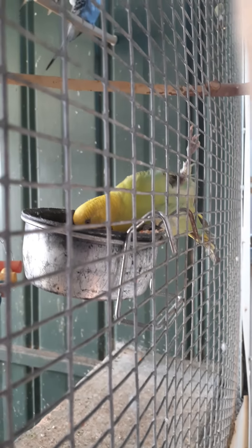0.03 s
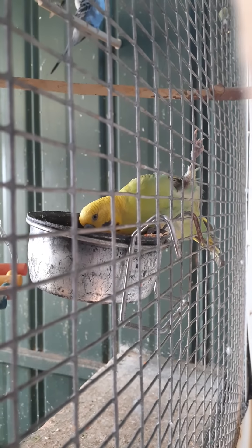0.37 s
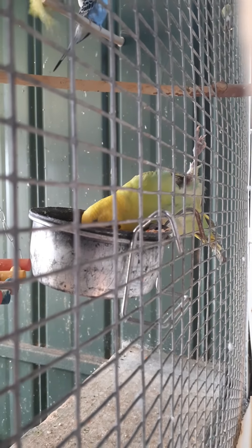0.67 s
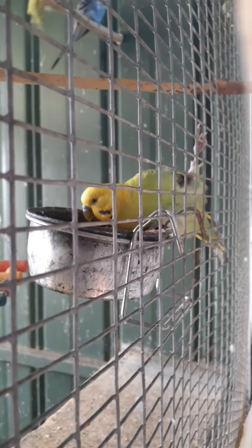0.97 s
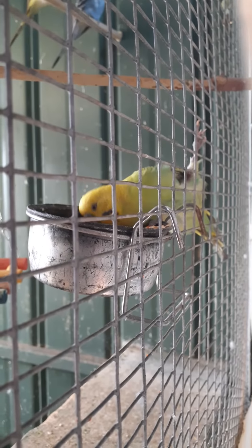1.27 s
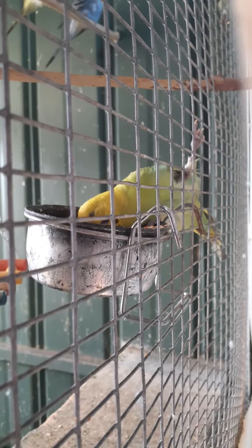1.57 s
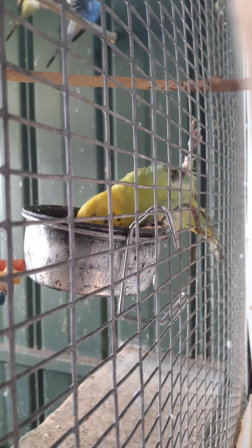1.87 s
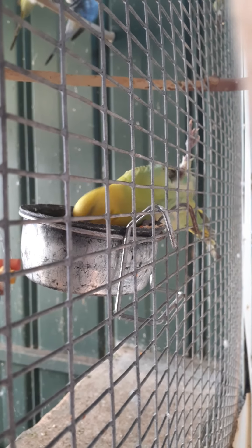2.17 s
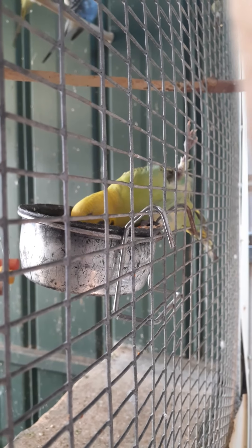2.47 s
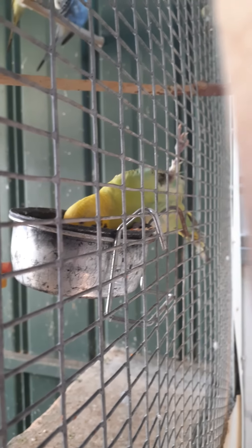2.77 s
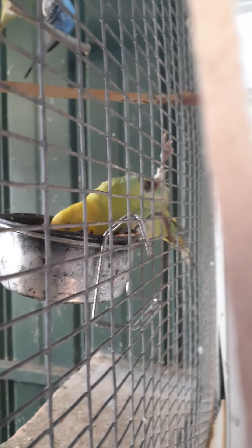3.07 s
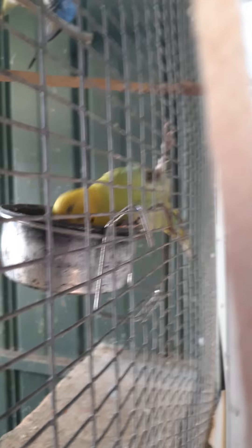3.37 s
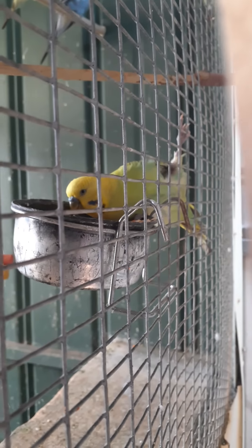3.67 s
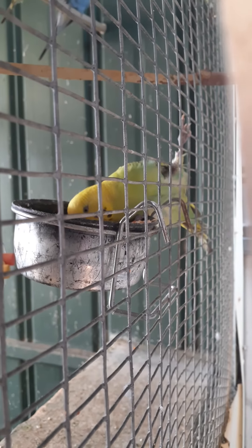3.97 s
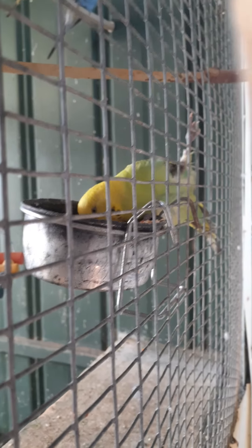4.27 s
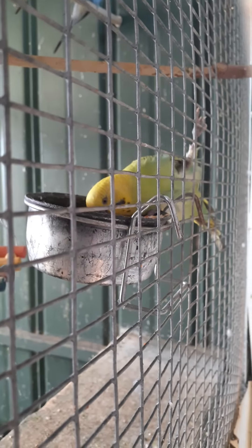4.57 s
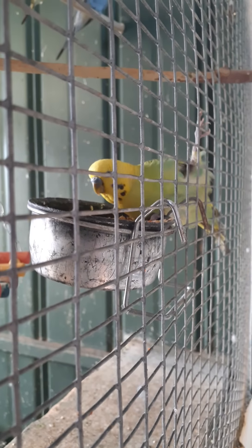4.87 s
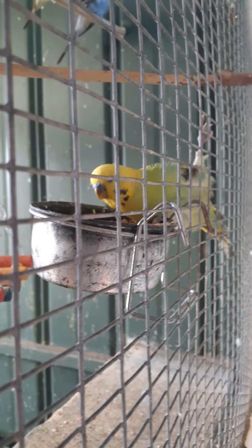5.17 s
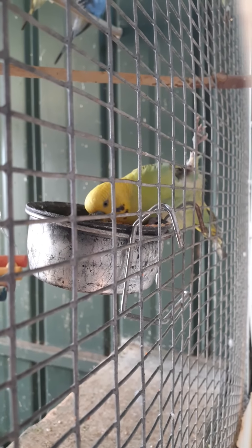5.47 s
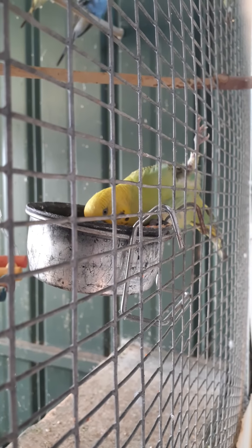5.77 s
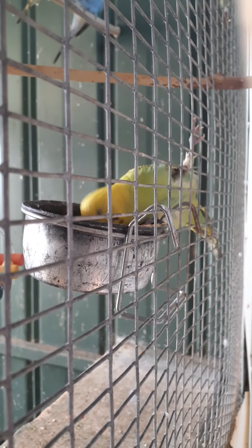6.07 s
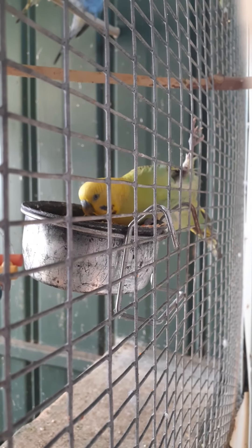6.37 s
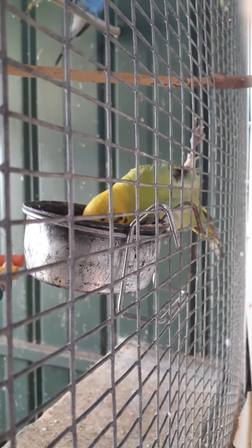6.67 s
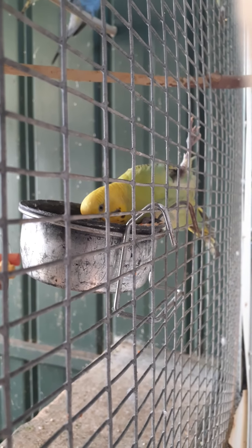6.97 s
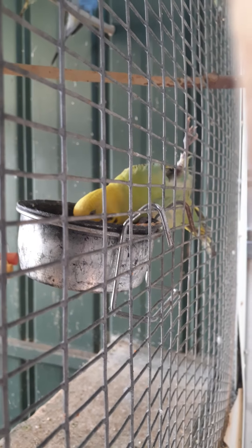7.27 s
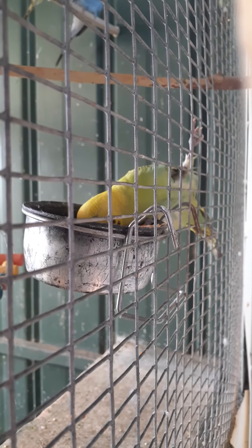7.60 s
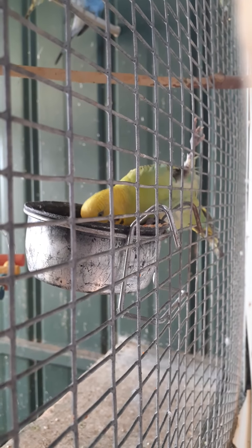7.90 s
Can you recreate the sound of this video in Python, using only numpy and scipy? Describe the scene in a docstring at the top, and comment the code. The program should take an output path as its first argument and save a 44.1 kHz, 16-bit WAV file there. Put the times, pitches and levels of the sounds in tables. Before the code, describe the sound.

A budgie feeds from a metal bowl in a small aviary, stirring seed, cracking husks with tiny clicks and bumping the bowl so it rings faintly. Other budgies give short whistled chirps, then quick warbles. Past the middle the digging peaks and three raspy squawks stand out, before feeding continues with one last warble. A few dull knocks land close to the microphone over a faint outdoor rumble.

```python
"""A budgerigar digs for seed in a metal bowl hung on the wire of a small, hard-walled aviary.
From the start its beak stirs seed, cracks husks and bumps the bowl; other budgerigars chirp in short
whistled glides, with a few dull knocks close by and a faint outdoor rumble throughout. At 2 s something
brushes past on the right. Warbling follows from 3.3 s; around 5 s the digging peaks and three forced
squawks break into a rasp. The feeding goes on, with a last warble at 7.4 s."""
import sys
import numpy as np
from scipy import signal
from scipy.fft import rfft, irfft
from scipy.io import wavfile

SR = 44100
rng = np.random.default_rng(int(sys.argv[2]) if len(sys.argv) > 2 else 0)


def unload_audio(sound):
    """Save the sound as a 16-bit wav file, at the path given as the first command line argument."""
    columns = np.transpose(np.atleast_2d(sound))
    # keep every value between -1 and 1, then stretch to whole-number steps
    steps = np.round(np.clip(columns, -1, 1) * 32767)
    wavfile.write(sys.argv[1], SR, steps.astype(np.int16))


N = 354343
TIME_S = np.arange(N) / SR
CUTOFF_HZ = 15900

# Drives outdoor rumble and bowl hum. Each row: time in seconds, relative level in dB.
LOW_LEVEL_CURVE = [(0.0, -61), (0.24, -68.5), (1.32, -64.5), (2.39, -69.5), (3.96, -64), (4.58, -69.5),
                   (4.79, -60.5), (5.16, -66.5), (5.46, -57), (5.77, -67), (6.35, -64.5), (6.84, -73),
                   (7.2, -67), (8.03, -71.5)]


def digging(thud_db=-1, ring_db=-6, scrape_db=-1):
    """Seeds tumble against each other and the metal; returns the bowl's shudder and the rustle."""
    # Each row: start in seconds, length in seconds, relative thud, scrape and husk levels in dB.
    digs = [(0.034, 0.06, -55, -52.5, -65), (0.099, 0.056, -51, -56, -60), (0.494, 0.064, -64.5, -71, -79),
            (0.859, 0.017, -57, -60.5, -70), (0.95, 0.012, -78, -90, -65),
            (1.069, 0.063, -62.5, -69, -56.5), (1.153, 0.053, -56.5, -58.5, -73.5),
            (1.388, 0.025, -78, -83, -69), (1.46, 0.062, -58, -71.5, -78), (1.679, 0.056, -62, -59.5, -58),
            (1.732, .08, -57, -71, -95), (1.835, 0.082, -55, -58, -69.5), (2.682, 0.1, -66.5, -61.5, -70.5),
            (3.476, 0.062, -83, -60, -61.5), (4.534, 0.085, -61.5, -68, -71), (4.64, 0.04, -52, -45, -75),
            (4.669, 0.018, -51, -50.5, -69), (4.704, 0.087, -51, -56, -62), (4.803, 0.085, -59.5, -63, -77),
            (4.964, 0.012, -57, -51, -45), (5.314, 0.17, -48.5, -53, -56),
            (5.987, 0.038, -60.5, -61.5, -59), (6.179, 0.011, -83, -67, -59),
            (6.239, 0.062, -59.5, -49.5, -80), (6.386, 0.077, -60.5, -63, -57.5),
            (6.491, 0.021, -62, -82, -58), (6.521, 0.043, -65, -52.5, -62.5),
            (7.05, 0.047, -87, -66, -58.5), (7.093, 0.037, -76, -54, -76), (7.295, 0.07, -58, -61.5, -73),
            (7.926, 0.038, -66.5, -69, -101)]
    # Spectra of bowl thud, seed scrape and husk rustle. Each row: frequency in Hz, density in dB.
    thud_spectrum = [(40, -11), (70, 0), (130, 3.5), (200, 0.5), (320, -0.5), (480, -2.5), (800, -19.5),
                     (1600, -34)]
    scrape_spectrum = [(300, -15), (650, 2), (1100, 2), (1900, -3.5), (3000, -4.5), (4500, -15.5),
                       (7000, -26.5)]
    husk_spectrum = [(1500, -10.5), (3000, -8.5), (4500, -4), (7000, -4.5), (9300, 1.5), (10800, -3.5),
                     (12500, -3), (15500, -14)]
    thud, scrape, husk = np.zeros((3, N))
    for start_s, length_s, *levels_db in digs:
        force = beak_stroke(length_s)
        for envelope, level_db in zip((thud, scrape, husk), levels_db):
            add(envelope, start_s, force * from_db(level_db))
    bumps = thud * grains(per_s=900, spread_db=2.8)
    shudder = from_db(thud_db) * colour(bumps, thud_spectrum) + from_db(ring_db) * bowl_ring(bumps)
    rustle = from_db(scrape_db) * colour(scrape * grains(per_s=2500, spread_db=3), scrape_spectrum)
    rustle += colour(husk * grains(per_s=2000, spread_db=4.4), husk_spectrum)
    return shudder, rustle


def beak_stroke(length_s, rise_s=0.005, settle_s=0.014):
    """Force of one dig: quick in, easing off, then the seed settles."""
    t = TIME_S[:int(length_s * SR) + SR // 5]
    easing = from_db(2.5 - 5 * t / length_s)
    return np.minimum(t / rise_s, 1) * easing * np.exp(-np.maximum(t - length_s, 0) / settle_s)


def bowl_ring(force):
    """The bowl and its wire hanger ring in their modes."""
    # Each row: frequency in Hz, gain in dB, T60 in seconds.
    modes = [(123.4, -2.5, 0.88), (145.8, -8.5, 0.49), (297.5, -6, 0.37), (348.7, -1.5, 0.062),
             (445.6, -6.5, 0.1), (980, -13.5, 0.63), (1200, -18, .25)]
    return sum(from_db(db) * resonator(force, hz, t60_s) for hz, db, t60_s in modes)


def bowl_hum(gain_db=-8):
    """The bird's shifting weight keeps the bowl faintly ringing."""
    return bowl_ring(curve_gain(LOW_LEVEL_CURVE, gain_db) * grains(per_s=120, spread_db=5.9))


def nibbling(gain_db=3):
    """Tiny bright beak contacts between the digs."""
    # Each row: time in seconds, relative level in dB.
    activity = [(0.0, -76), (0.11, -86), (0.4, -76), (1.03, -75), (1.19, -83), (1.45, -82), (1.81, -78),
                (1.99, -89), (2.46, -83.5), (3.49, -84), (4.29, -87.5), (4.45, -81), (4.58, -74),
                (4.85, -66.5), (5.01, -69.5), (5.34, -56), (5.57, -85.5), (5.79, -80.5), (6.42, -71.5),
                (6.62, -86.5), (6.93, -88.5), (7.65, -73.5), (8.03, -82)]
    # Each row: frequency in Hz, density in dB.
    spectrum = [(2500, -15.5), (4000, -2), (7000, -2.5), (9700, 1.5), (12000, 1), (15500, -3)]
    return curve_gain(activity, gain_db) * colour(grains(per_s=710, spread_db=2.9), spectrum)


def husk_cracks():
    """Single husks snap in the beak and echo off the walls."""
    # Each row: start in seconds, relative level in dB.
    events = [(0.037, -49), (0.3745, -35), (0.8635, -39.5), (0.8966, -38.5), (1.061, -32.5),
              (1.3673, -45.5), (1.5844, -66), (2.7284, -39.5), (3.2846, -51), (3.929, -46.5),
              (4.4051, -35.5), (4.518, -45.5), (4.6754, -29), (5.2554, -45.5), (6.182, -47.5), (6.243, -33),
              (7.338, -45.5)]
    # Each row: frequency in Hz, density in dB.
    spectrum = [(200, -14.5), (900, -6.5), (2500, 5.5), (4500, 1.5), (7000, -3), (9500, -0.5),
                (15500, -5.5)]
    cracks = snaps(events, spectrum, gain_db=6, decay_s=0.0003)
    direct = place(cracks, pan_db=0, lead_ms=0.368)
    return direct + reflections(cracks, wet_db=2, early_db=1.5, pan_db=3, early_s=0.0043)


def feeding_bird():
    """Bowl, seed and husks, heard directly and off the walls."""
    shudder, rustle = digging()
    shudder += bowl_hum()
    bowl = from_db(-2.3) * place(shudder, pan_db=3.5, lead_ms=0.51)
    bowl += reflections(shudder, wet_db=-10.5, early_db=-9.5, pan_db=2, early_s=0.0081)
    rustle += nibbling()
    seed = from_db(-7.5) * place(rustle, pan_db=5, lead_ms=0.347)
    seed += reflections(rustle, wet_db=-4, early_db=-0.5, pan_db=1.7, early_s=0.0045)
    return bowl + seed + husk_cracks()


def near_birds(direct_db=-4):
    """Each call comes from its perch and excites the aviary on that side."""
    # Each row: start in seconds, length in seconds, first and last pitch in Hz,
    # relative level in dB, roughness from 0 to 1.
    syllables = [ (0.053, 0.011, 4430, 3700, -53.5, .2), (0.122, 0.039, 3370, 3590, -48, 0.45),
                 (0.27, 0.039, 3820, 4120, -54.5, 0.34), (0.363, 0.022, 4040, 3260, -34, 0.29),
                 (0.478, 0.021, 2800, 2614, -56, 0.42), (0.607, 0.035, 1944, 1640, -50, 0.18),
                 (0.757, 0.041, 2594, 2440, -55.5, 0.4), (1.02, 0.012, 2760, 2980, -44, 0.1),
                 (1.027, 0.027, 3630, 3600, -51, 0.25), (1.062, 0.013, 4670, 4140, -45.5, 0.1),
                 (1.079, 0.01, 3140, 3230, -33, 0.07), (1.099, 0.011, 3080, 3026, -35.5, 0.05),
                 (1.116, 0.016, 2610, 2175, -38.5, 0.35), (1.145, 0.028, 1757, 1396, -42, 0.26),
                 (1.226, 0.024, 2484, 2240, -54.5, 0.36), (2.493, 0.021, 3194, 3035, -43.5, .15),
                 (2.762, 0.051, 2004, 2310, -59, 0.32), (3.313, 0.028, 2780, 2430, -49.5, 0.2),
                 (3.326, 0.032, 2010, 1740, -43, 0.08), (3.372, 0.019, 1315, 1450, -40.5, 0.02),
                 (3.393, 0.027, 1734, 2235, -38, 0.26), (3.412, 0.037, 2993, 2597, -35.5, 0.09),
                 (3.712, 0.019, 1870, 2600, -49, 0.3), (3.736, 0.0087, 3500, 3900, -45, 0.2),
                 (3.744, 0.015, 3000, 2780, -41.5, 0.2), (3.761, 0.0091, 1564, 2260, -39, 0.29),
                 (3.766, 0.019, 3190, 2830, -39, 0.16), (3.793, 0.027, 2226, 2427, -34, 0.17),
                 (3.82, 0.015, 2827, 3104, -29.5, 0.16), (3.835, 0.02, 1804, 1504, -37.5, 0.29),
                 (3.875, 0.019, 2210, 1746, -41, 0.28), (4.751, 0.029, 4190, 3980, -35.5, 0.2),
                 (4.85, .014, 2020, 1890, -45, .15), (5.066, 0.019, 2446, 3040, -41, 0),
                 (5.082, 0.014, 3330, 4010, -38, 0.25), (5.095, 0.017, 3400, 2960, -34.5, 0.07),
                 (5.117, 0.021, 2810, 2500, -39, 0.09), (5.15, 0.02, 2545, 2626, -34, .05),
                 (5.168, .016, 2700, 3425, -27, .04), (5.185, .022, 2930, 1496, -42, 0.7),
                 (7.402, 0.021, 2606, 2850, -47, 0.2), (7.42, 0.0075, 3880, 4200, -41.5, 0.22),
                 (7.43, 0.021, 3210, 2796, -35, 0.13), (7.452, 0.019, 2610, 2535, -36.5, .08),
                 (7.468, 0.019, 1990, 2510, -40.5, 0.12), (7.488, 0.028, 2533, 3400, -29, 0.14),
                 (7.514, 0.023, 2384, 1302, -40, 0.27), (7.617, 0.034, 1713, 1720, -57, 0.33),
                 (7.993, .012, 5750, 5450, -52.5, 0.25)]
    # Each row: as above, with the held pitch in Hz in place of the last.
    squawks = [(4.912, 0.043, 951, 3200, -32.5, 0.7), (5.294, .044, 2204, 3750, -28.5, 0.67),
               (5.409, 0.056, 2997, 3600, -20, .9)]
    # Each row: valid from in seconds, left minus right in dB, left lead in ms, overtone gain in dB.
    perches = [(0, -5.5, -0.49, -2.5), (.6, -3.5, 0.26, 3.5), (1, -1.5, 0.57, -1.5), (2.4, -8.5, .16, 0),
               (2.9, -1.5, 0.46, -5), (3.7, -1.5, 0.57, 5), (5.06, -7.5, 0.59, 0.5), (5.28, -2.2, 0.48, 8),
               (7.39, -0.5, -0.6, -0.5)]
    ears = np.zeros((2, N))
    for voice, calls in ((syllable, syllables), (squawk, squawks)):
        for start_s, *shape in calls:
            perch = sum(from_s <= start_s for from_s, *_ in perches[1:])
            _, pan_db, lead_ms, overtone_db = perches[perch]
            call = place(voice(*shape, overtone_db), pan_db, lead_ms)
            for ear, sound in zip(ears, call):
                add(ear, start_s, sound)
    walls = reflections(ears, wet_db=-9, early_db=-2.5, pan_db=1.5, early_s=0.0084)
    return from_db(direct_db) * ears + walls


def syllable(length_s, first_hz, last_hz, level_db, roughness, overtone_db):
    """One short glide, up or down, lingering at its low end."""
    count = int(length_s * SR)
    height = np.linspace(0, 1, count) if last_hz > first_hz else np.linspace(1, 0, count)
    pitch_hz = min(first_hz, last_hz) + abs(last_hz - first_hz) * height ** 1.6
    envelope = from_db(level_db) * arch(count, power=0.53, skew=0.92)
    return envelope * syrinx(pitch_hz, roughness, overtone_db)


def squawk(length_s, first_hz, held_hz, level_db, roughness, overtone_db, leap_s=0.014):
    """A forced call leaps up to its pitch and roughens on the way."""
    climb = 1 - np.exp(-TIME_S[:int(length_s * SR)] / leap_s)
    pitch_hz = first_hz + (held_hz - first_hz) * climb
    envelope = from_db(level_db) * arch(len(climb), power=1.02, skew=1.04)
    return envelope * syrinx(pitch_hz, roughness * (0.3 + 0.7 * climb), overtone_db)


def syrinx(pitch_hz, roughness, overtone_db, tilt_db_per_octave=-15, forced_hz=3500):
    """A whistle that, when pushed, shakes in pitch and strength and breaks into a rasp; unit power."""
    # Throat and beak response. Each row: frequency in Hz, gain in dB.
    throat = [(1000, -14.5), (1800, -9.5), (3200, 0.5), (4500, -6), (6500, -9), (8500, 0.5), (12000, -1),
              (16000, -13)]
    # Each row: frequency in Hz, density in dB.
    rasp_spectrum = [(500, -31), (1200, -6.5), (2200, -10), (3700, 1), (5000, -4.5), (7000, -14),
                     (9000, -9.5), (11000, -15), (16000, -25)]
    count = len(pitch_hz)
    jitter_hz = 700 * (roughness + 0.016)   # even a clear note quivers
    hz = pitch_hz + jitter_hz * flutter(380, count)
    phase = 2 * np.pi * np.cumsum(hz) / SR
    harmonic = np.arange(1, 8)[:, None]
    gains = from_db(at_hz(throat, harmonic * hz) + tilt_db_per_octave * np.log2(harmonic))
    gains *= harmonic * hz < CUTOFF_HZ
    # Overtones beam forward and come and go as the head turns.
    gains[1:] *= from_db(overtone_db + 4 * flutter(140, count, channels=len(harmonic) - 1))
    tone = np.sum(gains * np.sin(harmonic * phase), axis=0)
    tone /= np.sqrt(np.sum(gains ** 2, axis=0) / 2 + 1e-12)
    rasp = from_db(-1) * colour(rng.standard_normal(count), rasp_spectrum)
    breakup = roughness ** 1.3 * np.minimum(pitch_hz / forced_hz, 1) ** 0.4   # high notes break most
    shimmer = from_db(9 * roughness / (1 + roughness) * flutter(600, count))
    pushes = from_db(2 * flutter(130, count))
    return rms_one((np.sqrt(1 - breakup ** 2) * tone + breakup * rasp) * shimmer * pushes)


def far_birds():
    """Soft chirps from the far end arrive largely by way of the walls."""
    # Each row: start in seconds, length in seconds, first and last pitch in Hz, relative level in dB.
    chirps = [(0.771, 0.066, 998, 980, -62), (2.405, 0.079, 1155, 1355, -60.5),
              (2.681, 0.049, 1088, 988, -54.5), (2.924, 0.044, 1440, 1500, -68),
              (3.136, .035, 1385, 1520, -71.5), (3.473, 0.087, 1480, 1261, -55.5),
              (3.558, 0.045, 1056, 870, -60.5), (3.984, 0.032, 1600, 1266, -57.5),
              (4.095, 0.049, 1030, 980, -67.5), (4.237, 0.026, 2860, 2400, -62),
              (4.307, 0.048, 1265, 1510, -58), (5.6, 0.048, 1990, 1702, -57),
              (5.765, 0.044, 1050, 990, -61), (5.816, 0.053, 1200, 1096, -62)]
    voices = np.zeros(N)
    for start_s, *shape in chirps:
        add(voices, start_s, syllable(*shape, roughness=0.212, overtone_db=-14.5))
    direct = from_db(-1) * place(voices, pan_db=-6, lead_ms=-0.23)
    return direct + reflections(voices, wet_db=-5, early_db=-2, pan_db=-2, early_s=0.013)


def knocks():
    """Dull knocks right by the left microphone."""
    # Each row: start in seconds, relative level in dB.
    events = [(0.097, -34), (2.763, -45), (4.039, -46), (4.536, -52.5), (7.337, -37.5)]
    # Each row: frequency in Hz, density in dB.
    spectrum = [(100, 2), (300, -0.5), (550, 5), (1000, -22), (2200, -9.5), (5000, -30), (9000, -29)]
    return place(snaps(events, spectrum, gain_db=15.5, decay_s=0.00013), pan_db=16.5, lead_ms=0.05)


def brush(start_s=2.0, length_s=0.87, gain_db=-66.5):
    """A slow swell of friction noise close to the right microphone."""
    # Each row: frequency in Hz, density in dB.
    spectrum = [(500, -8.5), (1250, 4.5), (2000, -5), (2700, 10), (3500, -15), (5000, -15.5), (7000, -33)]
    track, count = np.zeros(N), int(length_s * SR)
    friction = colour(rng.standard_normal(count), spectrum)
    add(track, start_s, from_db(gain_db) * arch(count, power=0.65, skew=1.67) * friction)
    return place(track, pan_db=-15.5, lead_ms=0.47)


def outdoor_rumble():
    """Faint low noise, slightly to the left."""
    # Each row: frequency in Hz, density in dB.
    spectrum = [(15, -51), (25, -16.5), (48, 2), (102, -4.5), (151, -3), (227, -7.5), (301, -1),
                (335, -8.5), (419, -11), (565, -17), (900, -26.5), (1170, -52), (1980, -120)]
    return curve_gain(LOW_LEVEL_CURVE, 0.6) * diffuse(spectrum, side_db=-8.5) * from_db([[1.2], [-1.2]])


def distant_wash():
    """Wide midrange noise whose level flickers."""
    # Each row: time in seconds, relative level in dB.
    levels = [(0.0, -62.5), (0.18, -73), (0.74, -67), (2.19, -79), (2.57, -67), (3.04, -76), (3.71, -65.5),
              (4.27, -77.5), (4.65, -68), (4.81, -61.5), (5.07, -67.5), (5.46, -55), (6.02, -79.5),
              (6.26, -78), (6.44, -70.5), (6.73, -80), (7.42, -76), (8.03, -77.5)]
    # Each row: frequency in Hz, density in dB.
    spectrum = [(500, -2), (800, -1), (1250, 0.5), (2100, -8.5), (2750, 1), (3500, -10.5), (6000, -24.5)]
    flicker_db = 2.5 * flutter(25, N)
    return curve_gain(levels, flicker_db - 1) * diffuse(spectrum, side_db=-0.5)


def reflections(x, wet_db, early_db, pan_db, early_s, alike_below_hz=660):
    """Hard walls return close echoes and a dying tail, different at each ear above the bass."""
    # Aviary decay. Each row: frequency in Hz, T60 in seconds.
    decay = [(200, 0.45), (1000, 0.31), (3000, 0.24), (8000, 0.22), (15000, 0.16)]
    t = TIME_S[:SR // 2]
    hz = np.fft.rfftfreq(len(t), 1 / SR)
    centres_hz = np.geomspace(200, 15000, 8)
    white = rfft(rng.standard_normal((2, len(t))))
    tail = response = 0
    for k, centre_hz in enumerate(centres_hz):
        band = np.interp(hz, centres_hz, np.arange(len(centres_hz)) == k)
        tail += irfft(white * band, len(t)) * from_db(-60 * t / at_hz(decay, centre_hz))
    early = rng.standard_normal((2, len(t))) * (rng.random((2, len(t))) < 0.15) * np.exp(-t / early_s)
    for part, level_db in ((tail * (t > 0.006), wet_db), (early * (t > 0.0007), early_db)):
        response += from_db(level_db) * part / np.linalg.norm(part, axis=1, keepdims=True)
    mid, side = response
    side = signal.lfilter(*signal.butter(2, alike_below_hz, "high", fs=SR), side)
    response = np.array([mid + side, mid - side]) / np.sqrt(2)
    balance = from_db([[pan_db / 2], [-pan_db / 2]])
    return signal.oaconvolve(np.atleast_2d(x), response, axes=1)[:, :N] * balance


def place(x, pan_db, lead_ms):
    """Two spaced microphones; positive values make the left louder and earlier."""
    samples = np.arange(len(x))
    half_lead = lead_ms / 1000 * SR / 2
    return np.array([from_db(side * pan_db / 2) * np.interp(samples + side * half_lead, samples, x)
                     for side in (1, -1)])


def diffuse(spectrum, side_db):
    """Steady stereo noise from all around."""
    mid, side = (colour(noise, spectrum) for noise in rng.standard_normal((2, N)))
    return mid + from_db(side_db) * side * [[1], [-1]]


def snaps(events, spectrum, gain_db, decay_s):
    """Brief bursts of contact noise."""
    track, t = np.zeros(N), TIME_S[:SR // 100]
    for start_s, level_db in events:
        burst = rng.standard_normal(len(t)) * np.exp(-t / decay_s)
        add(track, start_s, from_db(level_db + gain_db) * burst / np.linalg.norm(burst))
    return colour(track, spectrum)


def grains(per_s, spread_db):
    """Tiny contacts of uneven size at random moments; unit power."""
    sizes = from_db(spread_db * np.minimum(rng.exponential(1, N), 4)) * rng.choice([-1, 1], N)
    return rms_one(sizes * (rng.random(N) < per_s / SR))


def resonator(x, hz, t60_s):
    """One mode; white noise keeps its power."""
    radius, angle = from_db(-60 / (t60_s * SR)), 2 * np.pi * hz / SR
    gain = np.sqrt(2 * (1 - radius ** 2)) * np.sin(angle)
    return signal.lfilter([gain], [1, -2 * radius * np.cos(angle), radius ** 2], x + 1e-18)


def colour(x, spectrum, taps=4096):
    """Minimum-phase filter with 24 dB/octave skirts; white noise keeps its power."""
    hz = np.maximum(np.fft.rfftfreq(taps, 1 / SR), 1)
    octaves_outside = np.abs(np.log2(hz / np.clip(hz, spectrum[0][0], spectrum[-1][0])))
    gain = rms_one(from_db(at_hz(spectrum, hz) - 24 * np.minimum(octaves_outside, 3)))
    cepstrum = irfft(np.log(gain))
    cepstrum[1:taps // 2] *= 2
    cepstrum[taps // 2 + 1:] = 0
    return signal.oaconvolve(x, irfft(np.exp(rfft(cepstrum))))[:len(x)]


def flutter(rate_hz, count, channels=1):
    """Random wobble up to the given rate; unit power."""
    run_in = int(2 * SR / rate_hz)
    noise = rng.standard_normal((channels, count + run_in))
    wobble = signal.lfilter(*signal.butter(2, rate_hz, fs=SR), noise)
    return rms_one(wobble[:, run_in:]).squeeze()


def arch(count, power, skew):
    """Swell and fade; a skew below 1 brings the top forward."""
    return np.abs(np.sin(np.pi * np.linspace(0, 1, count) ** skew)) ** power


def curve_gain(curve, offset_db):
    """Gain at every sample from a level curve."""
    return from_db(np.interp(TIME_S, *np.transpose(curve)) + offset_db)


def at_hz(points, hz):
    """Interpolate on a log-frequency axis."""
    points = np.array(points)
    return np.interp(np.log(np.maximum(hz, 1)), np.log(points[:, 0]), points[:, 1])


def add(track, start_s, sound):
    """Mix a short sound into a track."""
    span = track[int(start_s * SR):][:len(sound)]
    span += sound[:len(span)]


def from_db(db):
    """Decibels to gain."""
    return 10 ** (np.asarray(db) / 20)


def rms_one(x):
    """Scale to unit power."""
    return x / np.sqrt(np.mean(x ** 2) + 1e-20)


def scene():
    """The feeding bird and the flock over the outdoor background."""
    return (feeding_bird() + knocks() + outdoor_rumble() + distant_wash()
            + near_birds() + far_birds() + brush())


def record(dry):
    """The microphone drops the deepest bass; the top is cut steeply."""
    thin = signal.sosfilt(signal.butter(4, 42, "high", fs=SR, output="sos"), dry)
    return signal.sosfilt(signal.ellip(10, 0.1, 80, CUTOFF_HZ, fs=SR, output="sos"), thin)


dry = scene()
out = record(dry)
unload_audio(out)
```